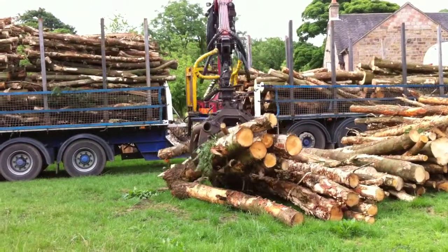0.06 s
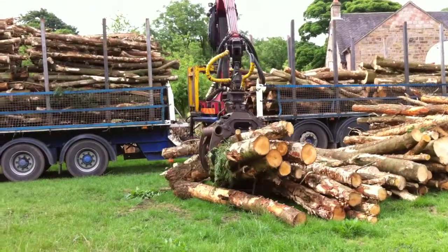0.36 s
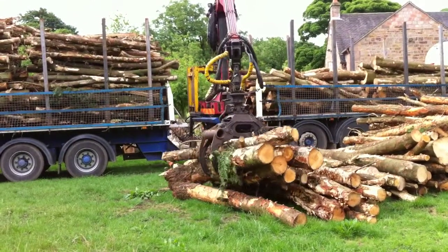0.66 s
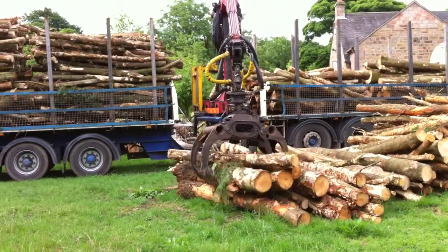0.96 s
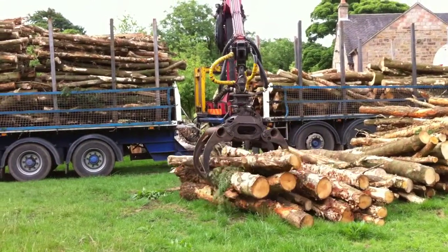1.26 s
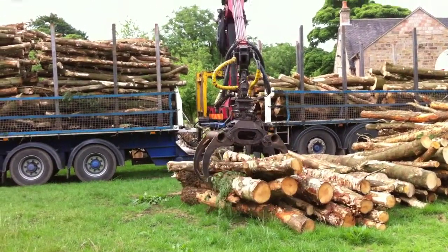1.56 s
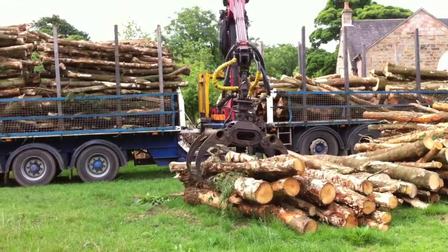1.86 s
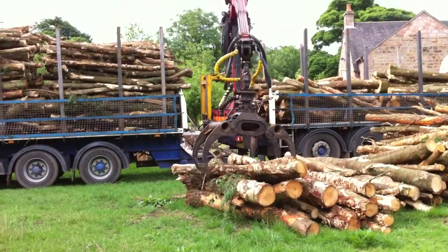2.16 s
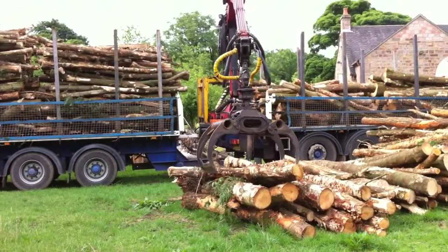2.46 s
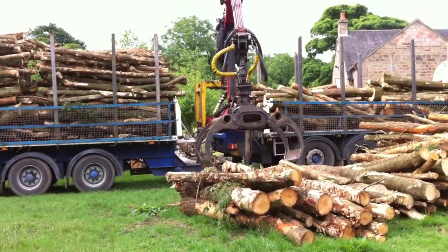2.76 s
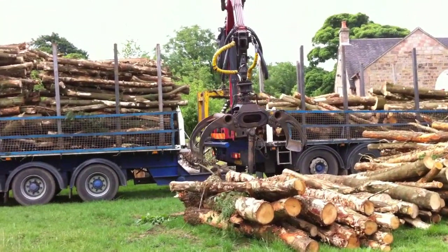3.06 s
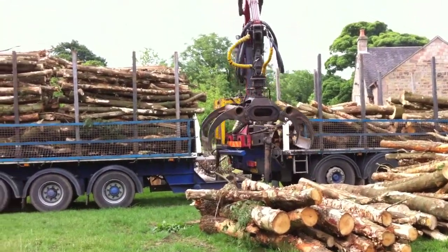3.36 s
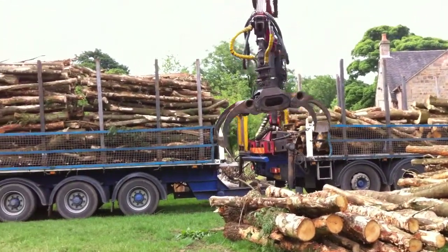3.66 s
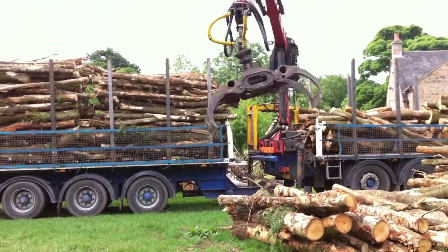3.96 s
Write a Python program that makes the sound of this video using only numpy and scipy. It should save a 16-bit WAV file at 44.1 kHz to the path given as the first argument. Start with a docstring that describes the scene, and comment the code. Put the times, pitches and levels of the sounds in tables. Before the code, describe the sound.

Logs knock, thud and crunch onto a pile from about 0.9 to 1.3 seconds, with bright snaps of bark, fairly close outdoors. Lighter knocks follow at 1.5 and 2.1 seconds. Around 3.2 seconds a steel grapple scrapes briefly over the wood. A diesel truck engine drones throughout, swelling slightly just before the logs land, with a faint hydraulic pump whine and small hisses and whistles from the valves.

```python
"""Lorry crane unloading logs

In a yard, at one microphone, near enough that the direct sound leads the echoes. A crane lowers a
bundle of logs onto a pile on grass: they knock, thud and crunch their bark. The grapple opens and
lifts away, its steel tines scraping past them. The diesel drones throughout, with the whine of its
pump and the hiss of oil in the valves."""
import sys
import numpy as np
from scipy import signal
from scipy.fft import rfft, irfft
from scipy.io import wavfile

SR = 44100
rng = np.random.default_rng(int(sys.argv[2]) if len(sys.argv) > 2 else 0)


def inscribe(sig):
    """Save sig as 16-bit PCM at rate SR to the path in sys.argv[1].

    A 1-D sig is mono; a 2-D sig holds one channel per row.
    Samples are clipped to [-1, 1] before scaling.
    """
    pcm = np.round(np.clip(np.atleast_2d(sig).T, -1, 1) * 32767)
    wavfile.write(sys.argv[1], SR, pcm.astype(np.int16))


N = 176400
T = np.arange(N) / SR
HIT_T = T[:N // 10]  # time within one contact [s]
CONTACT_RISE_S = 0.0011


def from_db(db):
    """Decibels to gain."""
    return 10 ** (np.asarray(db) / 20)


def rms_one(x):
    """Scale to unit rms."""
    return x / np.sqrt(np.mean(x ** 2) + 1e-20)


def in_time(curve):
    """A curve of (time [s], value) at every sample."""
    return np.interp(T, *np.transpose(curve))


def drift(rate_hz):
    """Smooth random wander of spread 1."""
    step, settle = 40, 2000
    pole = np.exp(-2 * np.pi * rate_hz * step / SR)
    noise = rng.standard_normal(N // step + settle + 2)
    slow = signal.lfilter([1], [1, -2 * pole, pole * pole], noise)[settle:]
    return np.interp(np.arange(N) / step, np.arange(len(slow)), rms_one(slow))


def colour(x, spectrum, size=4096):
    """Causal (minimum-phase) filter of the given shape; white noise keeps its power."""
    hz, db = np.transpose(spectrum)
    log_hz = np.log(np.linspace(1, SR / 2, size + 1))
    gain = rms_one(from_db(np.interp(log_hz, np.log(hz), db)))
    cepstrum = irfft(np.log(gain))
    cepstrum[1:size] *= 2
    cepstrum[size + 1:] = 0
    impulse = irfft(np.exp(rfft(cepstrum)))
    return signal.fftconvolve(x, impulse)[:len(x)]


def add(track, s, sound):
    """Mix a sound into a track at a time."""
    start = max(int(s * SR), 0)
    part = track[start:start + len(sound)]
    part += sound[:len(part)]


def tone(phase, db, shake=0.25):
    """A sine of the given rms level that flutters in strength."""
    flutter = 1 + shake * drift(6.1)
    return np.sqrt(2) * from_db(db) * flutter * np.sin(phase + 2 * np.pi * rng.random())


def diesel():
    """The lorry's engine: exhaust harmonics, and clatter that pulses with each firing."""
    # firing rate: (time [s], rate [Hz])
    firing = [(0,123.9),(.2,121),(.45,124.9),(1,125.5),(1.7,126),(2.2,127.9),(3,127.9),(3.3,130.9),(3.5,128),(3.8,130.5)]
    # exhaust note at the firing rate, and its octave: (time [s], level [dB])
    note = [(0,-33.5),(.3,-30.5),(.56,-24),(.75,-24.5),(.92,-28),(1.5,-30.5),(2.6,-32),(3.15,-37),(4,-37)]
    octave = [(0,-43),(.17,-36),(.4,-48),(1.1,-44.5),(1.3,-38.5),(2.05,-36.5),(2.3,-41.5),(4,-45)]
    # upper harmonics, strong while the crane bears the load: (time [s], level [dB])
    load = [(0,-38),(.2,-37),(.45,-41.5),(.75,-50.5),(1.8,-55),(2.8,-48.5),(4,-53.5)]
    # their balance: (multiple of the firing rate, gain [dB])
    load_orders = [(3,-1.5),(4,-5.5),(6,-11.5)]
    # mechanical noise: (frequency [Hz], relative density [dB]) and (time [s], level [dB])
    clatter_spectrum = [(30,-30),(70,-26),(110,0.5),(170,4),(290,1),(430,-6),(650,-2),(1000,-9),(1450,-8),(1750,-12),(2050,-9),(2600,-17),(3300,-29),(6000,-30.5),(15000,-53)]
    clatter_level = [(0,-35),(.4,-37.5),(1.7,-40.5),(4,-39.5)]
    phase = 2 * np.pi * np.cumsum(in_time(firing)) / SR + 0.05 * drift(8.5)
    exhaust = tone(phase, in_time(note), shake=0.02) + tone(2 * phase, in_time(octave))
    exhaust += sum(tone(k * phase, in_time(load) + db) for k, db in load_orders)
    pulsing = (1 + 0.12 * np.cos(phase)) * from_db(0.36 * drift(54))
    clatter = colour(rng.standard_normal(N) * pulsing, clatter_spectrum)
    return exhaust + from_db(in_time(clatter_level)) * clatter


def pump():
    """The hydraulic pump whines in four wavering harmonics."""
    # fundamental of the whine: (time [s], frequency [Hz])
    pitch = [(0,188),(.6,185.5),(1.5,190),(2,184),(4,182.5)]
    # harmonics: (multiple of the fundamental, level [dB])
    orders = [(1,-53),(2,-54.5),(3,-51.5),(4,-55.5)]
    phase = 2 * np.pi * np.cumsum(in_time(pitch) + 0.73 * drift(3.44)) / SR
    return sum(tone(k * phase, db, shake=0.39) for k, db in orders)


def valves(bend_power=5, clear_tone=0.3):
    """Oil hisses through the valves and now and then whistles upward, breathy with turbulence."""
    # oil hiss: (time [s], level [dB]) and (frequency [Hz], relative density [dB])
    hiss_level = [(0,-51),(.64,-53),(.7,-47.5),(.9,-48.5),(1.35,-56),(1.79,-65),(1.85,-52),(1.91,-56),(1.98,-46.5),(2.07,-54.5),(2.7,-52.5),(3.07,-54),(3.16,-55.5),(3.5,-58.5),(4,-54)]
    hiss_spectrum = [(1500,7.5),(3200,5),(4200,6),(5300,0),(8000,3.5),(9800,-0.5),(11500,3.5),(13500,-2),(15800,-8.5)]
    # whistles: (start [s], length [s], first pitch [Hz], last pitch [Hz], width [Hz], gain [dB])
    whistles = [(0.02,0.22,2500,2520,18,-51),(1.918,0.075,7200,7700,1400,-56.5),(1.92,0.12,11500,11900,1600,-60.5),
                (2.95,0.128,9700,12500,1200,-58),(2.86,0.26,14400,15500,2200,-64.5),(3.045,0.036,5400,6700,700,-60)]
    oil = from_db(in_time(hiss_level) + drift(23)) * colour(rng.standard_normal(N), hiss_spectrum)
    for s, length, start_hz, end_hz, width_hz, db in whistles:
        progress = np.clip((T - s) / length, 0, 1)
        bend = progress ** bend_power
        hz = start_hz + (end_hz - start_hz) * bend
        lowpass = signal.butter(2, width_hz / 2, fs=SR, output="sos")
        turbulence = rms_one(signal.sosfilt(lowpass, rng.standard_normal(N)))
        swell = 2 * np.sqrt(2 * progress * (1 - bend)) * from_db(db)
        oil += swell * (clear_tone + turbulence) * np.sin(2 * np.pi * np.cumsum(hz) / SR)
    return oil


def crunch(decay_s, grains_per_s=2800, grind=0.17, splinter_s=0.00058):
    """A contact: a dying run of tiny fractures over fine grinding, with a brief ring of its own."""
    n = len(HIT_T)
    fractures = rng.random(n) < grains_per_s / SR
    grain_db = np.minimum(rng.exponential(1, n), 2)
    grains = rms_one(fractures * from_db(grain_db) * rng.choice([-1, 1], n))
    fade = np.exp(-HIT_T / decay_s)
    rise = 1 - np.exp(-HIT_T / CONTACT_RISE_S)
    force = (grains + grind * rng.standard_normal(n)) * fade * rise
    splinter = rng.standard_normal(n) * np.exp(-HIT_T / splinter_s)
    force += signal.fftconvolve(force, splinter / np.linalg.norm(splinter))[:n]
    return rms_one(force) * np.sqrt(np.mean(fade ** 2))


def ring(modes, t60_s, scatter_db=4.5, detune=0.013):
    """Wood or steel rings after a blow, tuned and struck a little differently each time."""
    hz, db = np.transpose(modes)[:, :, None]
    strength, tuning, phase = rng.standard_normal((3, len(modes), 1))
    gain = from_db(db + scatter_db * strength)
    waves = np.sin(2 * np.pi * (hz * (1 + detune * tuning) * HIT_T + phase))
    fade = np.exp(-np.log(1000) * HIT_T / t60_s) * (1 - np.exp(-HIT_T / CONTACT_RISE_S))
    return fade * (gain * waves).sum(axis=0) / np.sqrt(np.sum(gain ** 2) / 2)


def favour(x, hz):
    """The place and hardness of a contact favour one region of pitch; the energy is kept."""
    peaked = x + signal.lfilter(*signal.iirpeak(hz, Q=3.5, fs=SR), x)
    return peaked * np.linalg.norm(x) / np.linalg.norm(peaked)


def logs():
    """Each knock crushes bark, rings the wood and thuds into the pile on the grass."""
    # log against log or grapple: (time [s], knock gain [dB], thud gain [dB], bark gain [dB],
    # crunch decay [s], favoured pitch [Hz])
    knocks = [(0.778,-39,-53,-64,0.06,1211),(0.947,-27,-34,-28,0.0098,1400),(.954,-16,-30,-30.5,0.019,1400),
              (.987,-15,-8.5,-29,0.019,1080),(1.022,-33,-11,-33,0.05,1700),(1.052,-10,-11.5,-36,0.0058,980),(1.073,-31,-22,-35,0.027,1700),
              (1.129,-24.5,-16,-35,0.076,900),(1.1555,-16.5,-34,-27,0.012,2640),(1.158,-9,-46,-25,0.0017,2080),(1.179,-15.5,-18,-27.5,0.0076,1650),(1.208,-21.5,-34,-37,0.011,1600),
              (1.235,-17.5,-36,-31,0.01,870),(1.266,-25.5,-39,-30.5,0.0099,2640),(1.296,-24.5,-45,-53,0.017,836),(1.308,-28.5,-36,-37,0.009,2700),
              (1.514,-31,-33,-59,0.017,1431),(2.09,-26.5,-44,-50,0.013,2888),(2.107,-32.5,-31,-53,0.049,1280),(2.133,-34.5,-23,-52,0.0099,2100),(2.174,-30.5,-23,-49,0.019,1350)]
    # ring of the logs and low thud of the pile: (frequency [Hz], relative level [dB])
    log_modes = [(625,-8.5),(705,-3.5),(875,-7),(1204,-17),(1335,-13),(1515,0),(2040,-4),(2140,-2.5),(2295,-22),(2435,-8),(2646,-5.5),(3200,-9.5)]
    thud_modes = [(155,-6),(177,-1.5),(220,-4),(282,-13.5)]
    # crunch of wood and crackle of bark: (frequency [Hz], relative density [dB])
    wood_spectrum = [(50,-28),(150,2),(430,-7),(750,2.5),(1100,-1),(1500,3),(2500,0.5),(3600,-10.5),(5000,-30),(12000,-60)]
    bark_spectrum = [(1000,1),(3500,8.5),(5000,0),(7500,4.5),(9800,-8.5),(12500,-7.5),(15800,-19)]
    thuds, wood, bark = np.zeros((3, N))
    for s, knock_db, thud_db, bark_db, decay_s, hz in knocks:
        blow = colour(crunch(decay_s), wood_spectrum) + from_db(-7) * ring(log_modes, t60_s=0.1)
        add(wood, s, from_db(knock_db) * favour(blow, hz))
        add(thuds, s, from_db(thud_db - 4) * ring(thud_modes, t60_s=0.086))
        add(bark, s, from_db(bark_db) * crunch(decay_s))
    thuds = signal.sosfilt(signal.butter(2, 150, "high", fs=SR, output="sos"), thuds)
    return wood + thuds + colour(bark, bark_spectrum)


def bark_snaps():
    """Some bark tears and snaps in bright bursts as the logs land."""
    # bursts: (start [s], level [dB], time to peak [s])
    snaps = [(0.84,-42,0.0018),(0.996,-38.5,0.026),(1.073,-28,0.0013),(1.094,-22,0.00067)]
    # their colour: (frequency [Hz], relative density [dB])
    snap_spectrum = [(1000,-11),(8000,1),(12000,0.5),(15800,-3.5)]
    bursts = np.zeros(N)
    for s, db, peak_s in snaps:
        swell = HIT_T / peak_s * np.exp(1 - HIT_T / peak_s)
        add(bursts, s, from_db(db) * rng.standard_normal(len(HIT_T)) * swell)
    return colour(bursts, snap_spectrum)


def grapple():
    """The opening tines slip over the logs in short scrapes with a bright steel edge."""
    # scrapes: (time [s], rub gain [dB], steel gain [dB], steel crunch decay [s], favoured pitch [Hz])
    scrapes = [(3.17,-39,-62,0.13,1210),(3.218,-25.5,-41,0.008,1300),(3.246,-28,-40.5,0.012,2100),(3.258,-24,-57,0.019,950),(3.272,-29,-44,0.02,1600),(3.515,-35.5,-66,0.0056,1290)]
    # dull rub and bright edge: (frequency [Hz], relative density [dB])
    rub_spectrum = [(60,-20),(300,-8),(520,1.5),(1000,0),(2400,-4.5),(5000,-25),(12000,-57)]
    steel_spectrum = [(2000,-3),(4500,-1),(5700,4),(8200,-3),(9600,-13),(11500,-8),(15800,-35)]
    # ring of the tines: (frequency [Hz], relative level [dB])
    tine_modes = [(5550, -0.11), (6250, -0.89)]
    rub, steel = np.zeros((2, N))
    for s, rub_db, steel_db, decay_s, hz in scrapes:
        drag = colour(crunch(1.35 * decay_s), rub_spectrum)
        add(rub, s, from_db(rub_db) * favour(drag, hz))
        edge = crunch(decay_s) + 0.44 * ring(tine_modes, t60_s=0.058)
        add(steel, s, from_db(steel_db) * edge)
    return rub + colour(steel, steel_spectrum)


def yard(x, t60_s=0.52, tail_db=-10.5):
    """What the yard sends back to the microphone: two dull echoes and a faint scattered tail."""
    # echoes off the trailer and the house nearby: (delay [s], gain [dB])
    echoes = [(0.018,-12),(.041,-12)]
    dull = signal.sosfilt(signal.butter(1, 4000, fs=SR, output="sos"), x)
    tail = rng.standard_normal(len(HIT_T)) * np.exp(-np.log(1000) * HIT_T / t60_s)
    reflected = from_db(tail_db) * signal.fftconvolve(dull, tail / np.linalg.norm(tail))[:N]
    for delay_s, db in echoes:
        add(reflected, delay_s, from_db(db) * dull)
    return reflected


def scene():
    """Timber and grapple in the foreground, the running lorry behind them, in mono."""
    blows = logs() + bark_snaps() + grapple()
    return (blows + yard(blows) + diesel() + pump() + valves())[None]


def record(dry, cutoff_hz=15800):
    """The microphone's signal, cut steeply at the top."""
    return signal.sosfilt(signal.ellip(12, .1, 90, cutoff_hz, fs=SR, output="sos"), dry)


dry = scene()
out = record(dry)
inscribe(out)
```